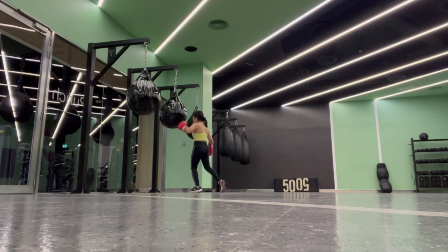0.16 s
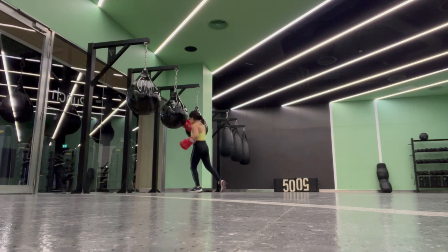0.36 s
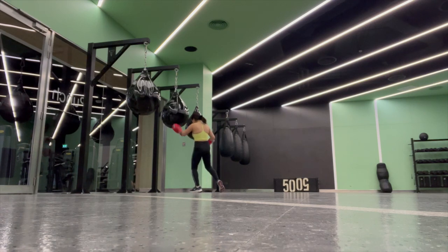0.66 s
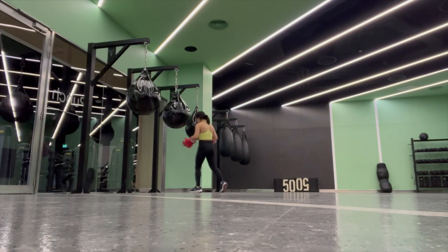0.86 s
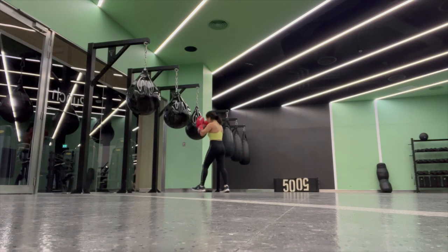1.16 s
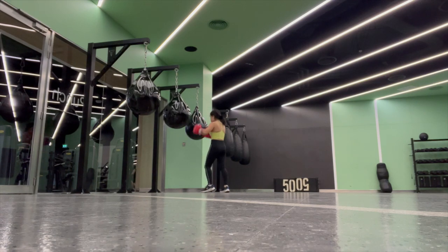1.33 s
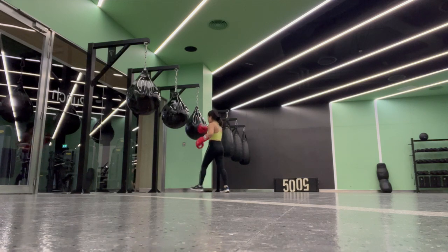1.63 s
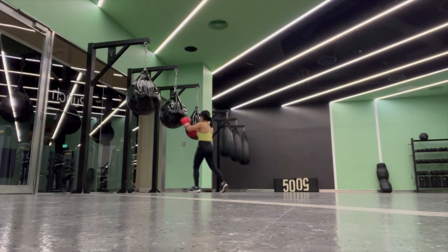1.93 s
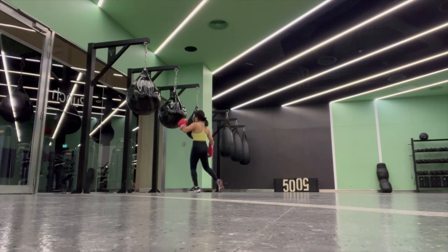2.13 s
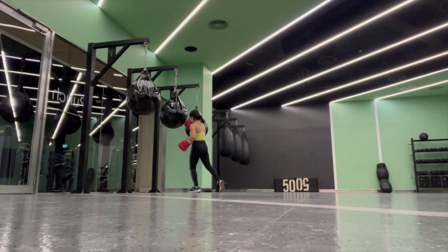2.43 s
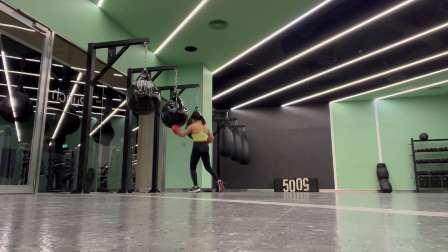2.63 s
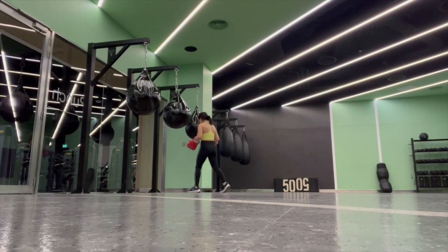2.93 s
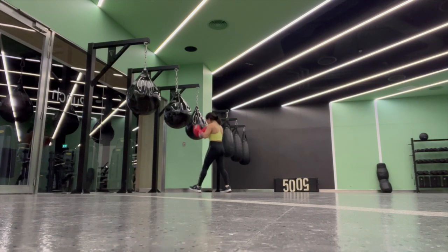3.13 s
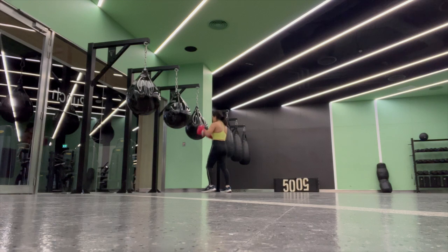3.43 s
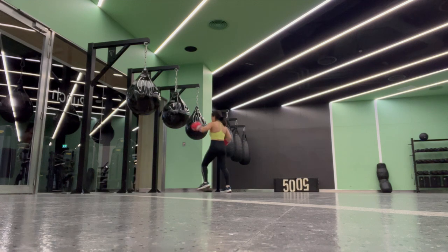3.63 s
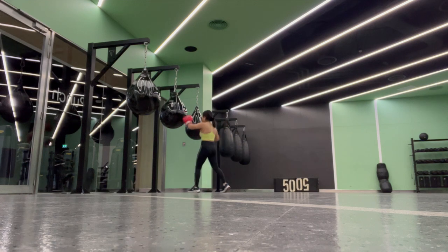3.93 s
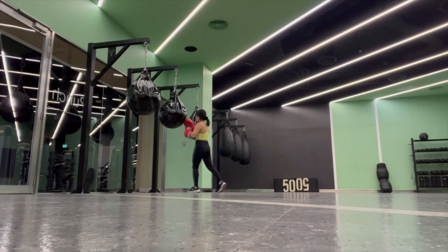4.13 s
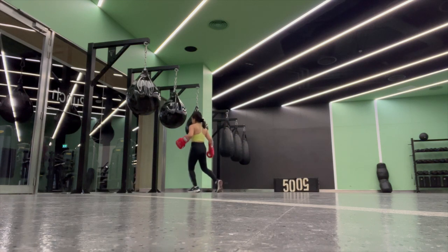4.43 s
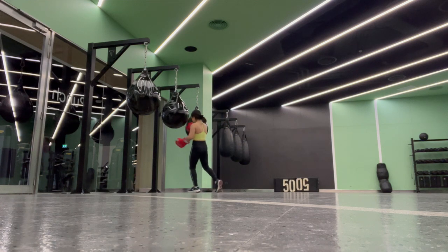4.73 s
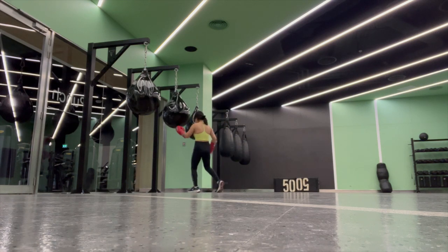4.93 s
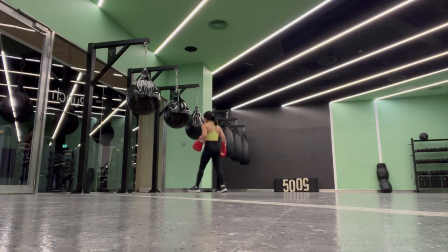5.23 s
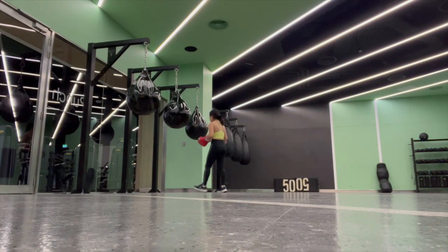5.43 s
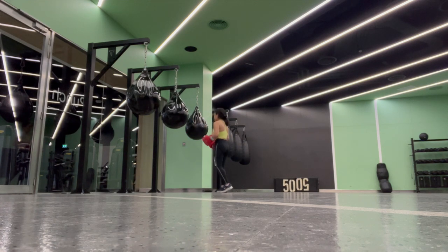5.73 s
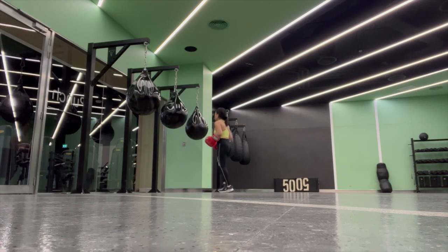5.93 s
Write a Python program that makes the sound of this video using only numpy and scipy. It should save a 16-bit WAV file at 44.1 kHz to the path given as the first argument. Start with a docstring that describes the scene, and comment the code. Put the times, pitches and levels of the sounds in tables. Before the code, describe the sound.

Steady dull ventilation noise with a wavering low hum and faint mid-pitched duct whistle fills a reverberant gym. Over it, a strong punch and a weaker one land in quick succession, then a pause with soft shoe taps, another strong-weak pair, one more shoe tap, then a weak hit, a strong hit and a last soft one. Bright leather smack, padded low thud, slight chain jingle and long room tail, heard from a distance.

```python
"""Large, hard-floored gym: gloved punches land on a hanging leather bag some metres off to the left.
Each blow is a leather crack (click and noise), a padded slap and a thud of swelling bag and room modes.
The chain clinks as decaying partials; the hall rings on as noise with a decay per band.
Shoes tap and a faint tone squeaks; ventilation is shaped noise, with a drifting sine whistle from a duct."""
import sys
import numpy as np
from scipy import signal
from scipy.fft import rfft, irfft, next_fast_len
from scipy.io import wavfile
from scipy.ndimage import uniform_filter1d, map_coordinates

SR = 44100
rng = np.random.default_rng(int(sys.argv[2]) if len(sys.argv) > 2 else 0)


def log_audio(samples):
    """Write samples as a 16-bit WAV file to the path given in sys.argv[1]."""
    # one column per channel
    frames = np.atleast_2d(samples).T
    # limit to full scale, then quantise
    limited = np.clip(frames, -1, 1)
    pcm = np.round(limited * 32767).astype(np.int16)
    wavfile.write(sys.argv[1], SR, pcm)


N = 268128


def amp(db):
    """Decibels to gain."""
    return 10 ** (np.asarray(db) / 20)


def unit(x):
    """x at rms 1."""
    return x / np.sqrt(np.mean(x ** 2) + 1e-20)


def along(points, hz):
    """Interpolate (Hz, value) points on a log frequency axis."""
    f, v = np.transpose(points)
    return np.interp(np.log(hz + 1), np.log(f + 1), v)


def slope_db(hz, db_per_octave, from_hz):
    """Flat up to from_hz, then a constant slope."""
    return db_per_octave * np.log2(np.maximum(hz, from_hz) / from_hz)


def resonance(hz, centre_hz, width_hz):
    """Peak of height 1, falling to half at the edges of its width."""
    return 1 / (1 + (2 * (hz - centre_hz) / width_hz) ** 2)


def between(square, slanted, glancing):
    """Value for a blow between square (0) and fully glancing (1)."""
    return square + (slanted - square) * glancing


def wobble(knots_per_s, size=N):
    """Smooth random curve."""
    knots = rng.standard_normal(int(size * knots_per_s / SR) + 4)
    return map_coordinates(knots, [np.arange(size) * knots_per_s / SR])


def patches(shape, bins, frames):
    """Random time-frequency field at rms 1, smoothed over bins and frames."""
    field = uniform_filter1d(rng.standard_normal(shape), size=bins, axis=0)
    return unit(uniform_filter1d(field, size=frames, axis=1))


def filtered(x, response):
    """x times a response of frequency."""
    size = next_fast_len(x.shape[-1] + 8192)
    spectrum = rfft(x, size) * response(np.fft.rfftfreq(size, 1 / SR))
    return irfft(spectrum, size)[..., :x.shape[-1]]


def add(track, start_s, sound):
    """Mix a stereo sound into the track."""
    track[:, round(start_s * SR):][:, :sound.shape[1]] += sound


def flat(hz):
    """Response of 1 at every frequency."""
    return 1


# likeness of left and right, nearly identical but opposed around 10 kHz: freq_hz, likeness (0-1)
LIKENESS = [(60, .99), (150, .93), (300, .72), (750, .6), (1000, .28), (1450, .12), (2000, .65), (2350, .2),
            (4000, .25), (7300, .15), (8400, .35), (9100, .8), (9600, .998), (11800, .998), (13500, .3)]
# right against left: freq_hz, phase_rad
RIGHT_PHASE = [(30, -.05), (100, -.27), (200, -.83), (340, -1.63), (400, -2.25), (600, -3.47), (800, -3.9),
               (1250, -4.7), (1500, -2.5), (2000, -1.4), (3000, 1.55), (3600, 5.2), (5000, 8.5),
               (6200, 12.1), (7500, 15.7), (16000, 15.7)]
# left minus right: freq_hz, level_db
LEFT_LEAN = [(100, .8), (200, 1.5), (300, 4), (450, 7.5), (750, 2.1), (1000, 5), (1300, 5), (1700, 11),
             (2200, 11), (3000, 7), (4500, 2.1), (5500, 4), (7000, 8), (8500, 2), (9500, 0)]


def spread(pair, gain, diffuse=True):
    """Left hears signal 1; right hears it phase-turned, mixed with signal 2 as far as the field is diffuse."""
    def response(hz):
        alike = along(LIKENESS, hz) if diffuse else 1
        right = amp(-along(LEFT_LEAN, hz))
        shared = right * alike * np.exp(1j * along(RIGHT_PHASE, hz))
        own = right * np.sqrt(1 - alike ** 2)
        return gain(hz) * np.array([np.ones(len(hz)), shared, own])
    left, shared, own = filtered(pair[[0, 0, 1]], response)
    return np.array([left, shared + own])


# air noise colour before levelling: freq_hz, density_db (dB per Hz)
AIR_COLOUR = [(13, -67), (24, -36), (36, -9), (55, -3.5), (87, -2.5), (130, -3.5), (200, -3.5), (350, -9),
              (600, -12.5), (1000, -15.5), (2000, -23.5), (4000, -36.5), (7000, -43), (11200, -53),
              (12000, -68.5), (16000, -77)]
# duct resonances: centre_hz, width_hz, level_db
DUCT_MODES = [(115, 30, -43), (172.6, 9.1, -45.5), (219.3, 85, -60.5)]
# wavering level of the lowest hum: time_s, level_db
HUM_LEVEL = [(0, -38), (1.2, -47), (1.55, -32.5), (1.85, -39), (2.1, -52.5), (2.75, -39.5), (3.3, -48),
             (4.5, -42.5), (5.4, -40.5), (6.08, -45)]
AIR_DB = -34
RUMBLE_SURGE_DB, RUMBLE_TOP_HZ = 1.5, 350


def ventilation():
    """Broad air noise, patchy and surging in the lows, over noise ringing in the ducts."""
    z = signal.stft(rng.standard_normal((2, N)), nperseg=512)[2]
    z = z * amp(1.5 * patches(z.shape[1:], bins=6, frames=14))
    pair = signal.istft(z, nperseg=512)[1][:, :N]
    air = amp(AIR_DB) * unit(spread(pair, lambda hz: amp(along(AIR_COLOUR, hz))))
    low = filtered(air, lambda hz: 1 / (1 + (hz / RUMBLE_TOP_HZ) ** 4))
    surge = unit(amp(RUMBLE_SURGE_DB * wobble(7)))
    air = air + low * (surge - 1)
    for centre_hz, width_hz, level_db in DUCT_MODES:
        noise = rng.standard_normal((2, N))
        air = air + amp(level_db) * unit(spread(noise, lambda hz: resonance(hz, centre_hz, width_hz)))
    hum = unit(spread(rng.standard_normal((2, N)), lambda hz: resonance(hz, 59, 14)))
    hum_db = np.interp(np.arange(N) / SR, *np.transpose(HUM_LEVEL))
    return air + amp(hum_db) * hum


WHISTLE_HZ = 760.5
# pitch drift: time_s, offset_hz (above WHISTLE_HZ)
WHISTLE_DRIFT = [(0, 0.85), (.8, 1.7), (1.1, 0), (1.45, -1.43), (2.9, -0.96), (3.15, -0.2), (3.4, 0.2),
                 (3.65, 1.6), (4.8, 1.1), (5.05, 0.3), (5.3, -2), (5.45, 0.2), (5.75, 0.2), (6.08, 1.3)]
# hall standing waves: offset_hz, left_db, right_db, phase_rad (right against left)
STANDING_WAVES = [(-0.6, -46.5, -44, 1.2), (0, -39.5, -47.5, 0.95), (0.92, -44, -42.5, 1.3),
                  (1.3, -47.5, -46.5, 1.3)]
# falters: time_s, depth_db, half_width_s (to 1/e of the depth)
WHISTLE_DIPS = [(.02, 9.5, 0.26), (.72, 12, 0.11), (3.53, 18, 0.09), (4.17, 14, 0.059), (4.65, 4, 0.096),
                (5.78, 19, 0.18)]


def whistle():
    """Sine drifting through standing waves: level and phase change differently on the left and right."""
    t = np.arange(N) / SR
    drift_hz = np.interp(t, *np.transpose(WHISTLE_DRIFT))
    offset_hz, *columns = np.transpose(STANDING_WAVES)
    left_db, right_db, turn_rad = [np.interp(drift_hz, offset_hz, column) for column in columns]
    waver_db = 1.7 * wobble(5.8) + .7 * wobble(22)
    for time_s, depth_db, half_width_s in WHISTLE_DIPS:
        waver_db -= depth_db * np.exp(-((t - time_s) / half_width_s) ** 2)
    phase = 2 * np.pi * np.cumsum(WHISTLE_HZ + drift_hz + 0.86 * wobble(7)) / SR
    gain = np.sqrt(2) * amp(waver_db + np.array([left_db, right_db]))
    return gain * np.sin([phase, phase + turn_rad])


# brief faint tone: start_s, length_s, pitch_hz, level_db
SQUEAKS = [(0.079, 0.076, 937, -42.5)]


def squeak():
    """Short soft-edged tone of unsteady pitch."""
    track = np.zeros((2, N + SR))
    for start_s, length_s, pitch_hz, level_db in SQUEAKS:
        t = np.arange(round(length_s * SR)) / SR
        phase = 2 * np.pi * np.cumsum(pitch_hz + 12 * wobble(70)[:len(t)]) / SR
        tone = np.sqrt(2) * np.sin(np.pi * t / length_s) * np.sin(phase)
        add(track, start_s, amp(level_db) * tone * np.ones((2, 1)))
    return track[:, :N]


# leather on leather, before levelling: freq_hz, density_db (dB per Hz)
CRACK_COLOUR = [(300, -17), (900, -5.5), (1400, 3), (2000, 5.5), (2700, 10), (3600, 1), (4400, -11),
                (7000, -18.5), (9500, -9.5), (16000, -9)]
# padded glove face: mean_hz, mean_db, t60_s
SLAP_MODES = [(519, 4.5, 0.022), (633, -4.5, 0.025), (970, -3.5, 0.0081), (1070, -14, 0.0045)]
# early echoes: delay_s, square_db, glancing_db
WALL_ECHOES = [(.0065, -13, -6), (.0135, -4, -13), (.0172, -6, -3), (.026, -14, -11)]
# crack as returned by the walls: freq_hz, gain_db
WALL_RETURN = [(2000, -3), (3800, 0), (4500, 8), (5300, 3), (10000, 6)]


def contact(crack_db, slap_db, soft_ms, tilt_db=0, colour=1, glancing=0, direct_db=0):
    """A leather crack and the padding's dull slap, both repeated by the nearest walls."""
    t = np.arange(SR // 5) / SR
    lead = 128  # samples of room before the crack
    scrape = 0.5 * rng.standard_normal(len(t)) * (1 - np.exp(-1000 * t / .3))
    click = (t == 0) * 4
    burst = np.exp(-1000 * t / soft_ms) * (scrape - click)
    burst = filtered(np.roll(burst, lead),
                     lambda hz: amp(colour * along(CRACK_COLOUR, hz) + slope_db(hz, tilt_db, 1000)))
    burst = amp(crack_db) * burst / np.abs(burst).max()

    slap = np.zeros(len(t))
    for mean_hz, mean_db, t60_s in SLAP_MODES:
        decay = amp(mean_db + rng.normal(0, 1.5) - 60 * t / t60_s)
        slap += decay * np.sin(2 * np.pi * mean_hz * rng.normal(1, .03) * t)
    slap = -amp(slap_db) * np.roll(slap * (1 - np.exp(-t / .0008)), lead + 20)
    blow = filtered(burst, lambda hz: amp(slope_db(hz, direct_db, 1500))) + slap

    # walls: off the slap's axis, hard enough to return the crack brightly
    sideways = filtered(burst, lambda hz: amp(along(WALL_RETURN, hz))) + amp(-17.5) * slap
    echoes = np.zeros((2, len(t)))
    for delay_s, square_db, glancing_db in WALL_ECHOES:
        echo_db = between(square_db, glancing_db, glancing) + rng.normal(0, 1.1, (2, 1))
        signs = [[1], [rng.choice([-1, 1])]]
        echoes += amp(echo_db) * np.roll(sideways, round(delay_s * SR)) * signs
    direct = spread(np.array([blow, blow]), flat, diffuse=False)
    return (direct + spread(echoes, flat))[:, lead - 48:]


# colour of the hall's answer, before levelling: freq_hz, density_db (dB per Hz)
HALL_COLOUR = [(40, -38), (70, -20), (100, -16), (200, -14), (300, -12), (400, -10), (750, -11),
               (1000, -16), (2000, -21), (4000, -31), (7000, -33), (12000, -36), (16000, -38)]
# late decay: freq_hz, t60_s
HALL_DECAY = [(100, 3.4), (300, 1.42), (1000, 1.27), (3000, 1.89), (6000, 1.43), (9000, 0.79)]
# build-up of the diffuse field: freq_hz, rise_s
HALL_BUILDUP = [(100, 0.0068), (300, 0.0023), (700, 0.0019), (3000, 0.0029), (8000, 0.0044)]
HALL_GAP_S = 0.0011  # diffuse field starts after the direct sound
RIPPLE_DB, RIPPLE_HZ = 2, 35.01  # uneven clusters of hall modes: depth, spacing
LUMPS_DB = 1.03  # clumping of the reflections


def hall(tilt_db, early_db, early_t60_s, ring_hz, ring_db):
    """Diffuse field: bands build up and die at their own speed, with a fast first drop above 400 Hz."""
    lead = 2048  # samples before the onset
    knots = rng.standard_normal(SR // 10)
    noise = filtered(rng.standard_normal((2, 2 * SR)),
                     lambda hz: amp(RIPPLE_DB * map_coordinates(knots, [hz / RIPPLE_HZ])))

    def colour(hz):
        ring = ring_db * resonance(hz, ring_hz, 0.058 * ring_hz)
        return amp(along(HALL_COLOUR, hz) + ring + slope_db(hz, tilt_db, 500))
    noise = unit(spread(noise, colour))

    hz, t, z = signal.stft(noise, SR, nperseg=256)
    t = np.maximum(t - lead / SR - HALL_GAP_S, 0)
    rise = (1 - np.exp(-t / along(HALL_BUILDUP, hz)[:, None])) ** 2
    late = amp(-60 * t / along(HALL_DECAY, hz)[:, None])
    early = amp(early_db - 60 * t / early_t60_s) * (hz > 400)[:, None]
    # clumped reflections: decay lumpy in time and colour
    lumps = amp(LUMPS_DB * patches(z.shape[1:], bins=3, frames=6))
    return signal.istft(z * rise * (late + early) * lumps, SR, nperseg=256)[1][:, lead:]


# shoe taps on the floor: start_s, crack_db, slap_db, hall_db
SHOE_TAPS = [(1.7468, -37.5, -31.5, -41), (1.97, -29, -41, -41), (3.3204, -30, -32.5, -42)]


def steps():
    """Light shoe taps: crack, slap and a hall answer with a bright band at 6.5 kHz, no thud."""
    track = np.zeros((2, N + 2 * SR))
    for start_s, crack_db, slap_db, hall_db in SHOE_TAPS:
        add(track, start_s, contact(crack_db, slap_db, soft_ms=1.3))
        answer = hall(tilt_db=-4.0, early_db=6.0, early_t60_s=0.12, ring_hz=6500, ring_db=8.0)
        add(track, start_s, amp(hall_db) * answer)
    return track[:, :N]


# chain links: mean_hz, mean_db, t60_s
CHAIN_LINKS = [(1790, -6.5, 0.047), (2230, -3, .1), (3025, 1, 0.15), (3460, -5, 0.14), (4080, -8.5, 0.055),
               (4550, -8, 0.07)]
RATTLE_S = .13  # mean of the random part of a clink's delay


def chain():
    """Each blow shakes the chain: scattered clinks, each ringing the links unevenly."""
    track = np.zeros((2, N + 2 * SR))
    t = np.arange(SR // 5) / SR
    for start_s, *_, chain_db in PUNCH_TABLE:
        for delay_s in rng.exponential(RATTLE_S, size=9):
            clink = np.zeros(len(t))
            for mean_hz, mean_db, t60_s in CHAIN_LINKS:
                decay = amp(mean_db + rng.normal(0, 4.4) - 60 * t / t60_s)
                cycles = mean_hz * rng.normal(1, 0.0088) * t + rng.uniform()
                clink += decay * np.sin(2 * np.pi * cycles)
            clink *= amp(chain_db - 28 * delay_s) * (1 - np.exp(-t / 0.0047))
            clink = spread(np.array([clink, clink]), flat, diffuse=False)
            add(track, min(start_s + .015 + delay_s, N / SR), clink)
    return track[:, :N]


# bag and low room modes, before each blow's scaling and scatter: mode_hz, mode_db, t60_s, rise_s
BAG_MODES = [(111, -1, 0.55, 0.06), (163.2, 3, 0.22, 0.025), (207.4, 0, 0.24, 0.018),
             (269.6, -5.5, 0.49, 0.0098), (297, 5.5, 0.25, 0.026), (343.2, -5, 0.25, 0.014),
             (372.6, -17.5, 0.19, 0.01), (468, -3, 0.19, 0.0042), (552, -9.5, 0.21, 0.012),
             (686, -2, 0.11, 0.0022), (899, -11.5, 0.15, 0.0054), (935, -17, 0.44, 0.059),
             (1102, -10.5, .12, 0.0051)]
WAVER = .012  # pitch wander while the filling shifts, as a share


def thud(quick, linger, even, detune):
    """Filled bag and low room modes, pushed together, swell over some cycles and die away."""
    t = np.arange(SR) / SR
    ring = np.zeros(SR)
    for mode_hz, mode_db, t60_s, rise_s in BAG_MODES:
        swell = (1 - np.exp(-t / (rise_s * quick))) ** 3
        wander = WAVER * np.cumsum(wobble(14, size=SR)) / SR
        level_db = between(mode_db, -1.7, even) + rng.normal(0, 1.2)  # evened towards -1.7 dB
        decay = amp(level_db - 60 * t / (t60_s * linger))
        cycles = mode_hz * (rng.normal(1, detune) * t + wander) + rng.normal(0.49, 0.14)
        ring += decay * swell * np.sin(2 * np.pi * cycles)
    return spread(np.array([ring, ring]), flat, diffuse=False)


# punches: start_s, strength_db, glancing (0-1), hall_tilt_db (per octave), hall_ring_hz, extra_thud_db,
# quick (share of the modes' rise time), extra_crack_db, extra_slap_db, direct_tilt_db (per octave), chain_db
PUNCH_TABLE = [(0.3455, -12.5, 0.02, -1.5, 4400, -1, 0.95, -0.5, 3.5, -0.2, -42),
               (0.6332, -22, 0.83, 1.5, 3180, 5.5, 0.89, 2.3, -1, -4, -51),
               (2.3595, -13.5, 0.1, -1.5, 4500, -1.4, 0.95, -2.5, 0.5, -0.3, -44),
               (2.6366, -22, 0.7, 0.45, 1850, 2.7, 0.5, 1.2, 1.5, -6, -44),
               (4.065, -26, 0.3, -1.84, 3580, 0.5, 0.38, -2.4, 1.5, 1, -57),
               (4.653, -13.5, 0.05, -2, 2187, 0, 0.73, -3, -0.5, 2, -49),
               (4.8597, -23.5, 0.97, -0.9, 1780, -2, 0.33, -5, -6.5, 0.5, -48)]
FULL_BLOW_DB = -14
DULL_DB = 0.65  # crack slope per octave, for each dB over or under a full blow
FLATTER_PER_DB = .12  # crack colour share lost per dB, once well under a full blow


def punches():
    """Contact, thud and hall; a glancing blow has a softer, longer crack, a shorter thud and more hall."""
    track = np.zeros((2, N + 2 * SR))
    for (start_s, strength_db, glancing, hall_tilt_db, hall_ring_hz, extra_thud_db, quick,
         extra_crack_db, extra_slap_db, direct_tilt_db, _) in PUNCH_TABLE:
        # (square, fully glancing); levels over the strength
        crack_db = strength_db + between(14.5, 13.5, glancing) + extra_crack_db
        slap_db = strength_db + between(5, 6.5, glancing) + extra_slap_db
        thud_db = strength_db + between(0.04, 4, glancing) + extra_thud_db
        hall_db = strength_db + between(-9.5, -7, glancing)
        soft_ms = between(0.2, 1.2, glancing)
        ring_db = between(1, 8.5, glancing)
        linger = between(1, 0.44, glancing)  # share of the modes' t60
        even = between(0.053, 0.32, glancing)  # levelling of the modes, share
        detune = between(.013, 0.038, glancing)  # pitch scatter, share

        over_db = strength_db - FULL_BLOW_DB
        colour = np.clip(1.5 + FLATTER_PER_DB * over_db, 0, 1)
        add(track, start_s, contact(crack_db, slap_db, soft_ms, DULL_DB * over_db, colour,
                                    glancing, direct_tilt_db))
        add(track, start_s, amp(thud_db) * thud(quick, linger, even, detune))
        answer = hall(hall_tilt_db, early_db=5.5, early_t60_s=0.05, ring_hz=hall_ring_hz, ring_db=ring_db)
        add(track, start_s, amp(hall_db) * answer)
    return track[:, :N]


def scene():
    """Blows, chain, steps and squeak over ventilation and whistle."""
    return ventilation() + whistle() + squeak() + steps() + chain() + punches()


# overall tone colour of the sound, with an uneven, thinning treble: freq_hz, gain_db
TONE_COLOUR = [(22, -14), (45, 2.3), (1000, -1.06), (1250, -0.5), (1500, -3.5), (1800, -0.3), (2200, -1.5),
               (2700, -3), (3050, -1.2), (3600, -0.5), (4600, 2), (5200, 0.5), (7000, 2.5), (8500, -1),
               (9500, -7), (10800, -6.5), (11700, -18.5), (12500, -42), (15000, -18.5)]
TOP_HZ = 15760


def record(dry):
    """Overall tone colour; nothing is kept from the band limit up."""
    return filtered(dry, lambda hz: amp(along(TONE_COLOUR, hz)) * (hz < TOP_HZ))


dry = scene()
out = record(dry)
log_audio(out)
```